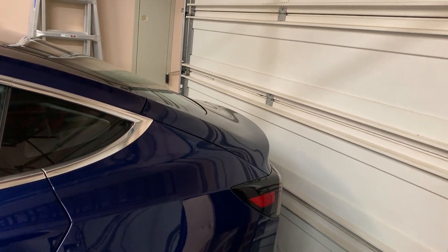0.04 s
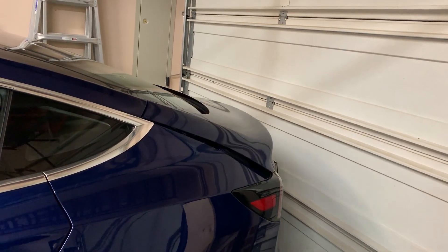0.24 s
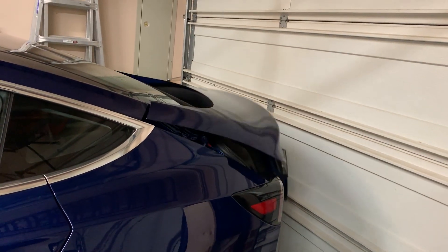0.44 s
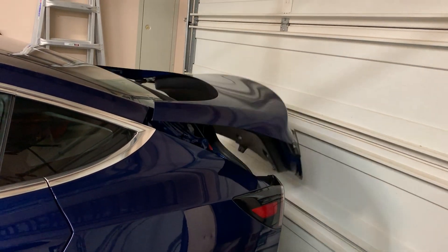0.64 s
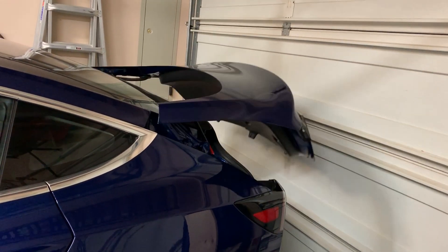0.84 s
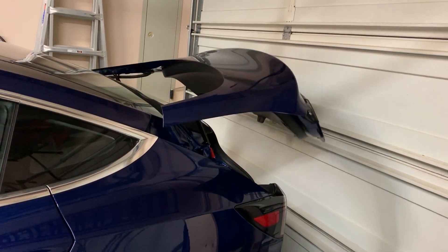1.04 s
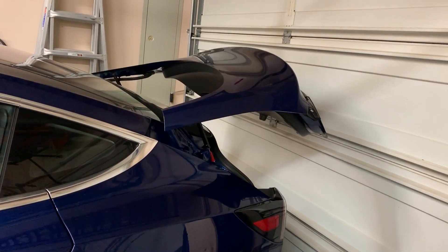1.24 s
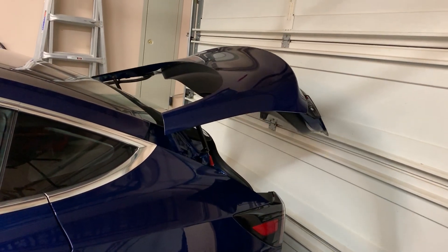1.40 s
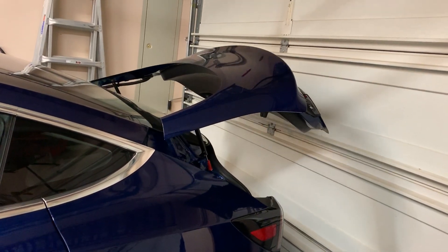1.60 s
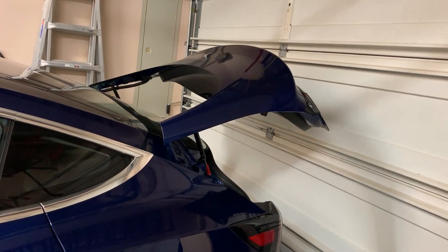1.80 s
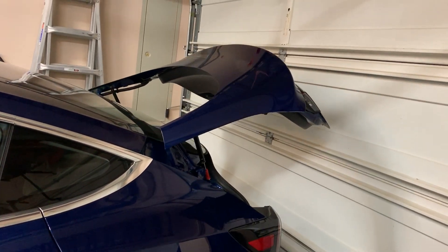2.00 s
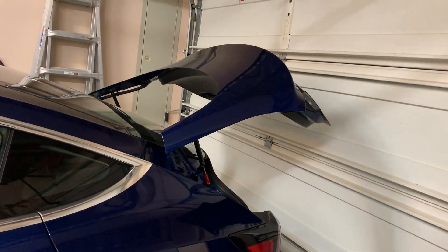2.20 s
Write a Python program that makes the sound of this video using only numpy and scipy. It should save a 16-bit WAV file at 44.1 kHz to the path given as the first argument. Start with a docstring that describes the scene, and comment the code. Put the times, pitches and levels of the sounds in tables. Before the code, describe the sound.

A car trunk unlatches with a whir and booming clunk, then lifts in a garage.

```python
"""Car trunk opening in a garage

The latch motor clicks and whirs, the lid pops off its seal with a boom, a clunk and a bright ring
of the steel catch, and the latch resets with a knock and a clack. Gas hisses through the struts as
the lid rises; their friction makes it shudder as it slows, then it creeps on with faint hinge knocks.
Hard walls throw it all back over a bed of low room tone."""
import sys
import numpy as np
from scipy import signal
from scipy.fft import rfft, irfft
from scipy.io import wavfile
from scipy.ndimage import uniform_filter1d

SR = 44100
rng = np.random.default_rng(int(sys.argv[2]) if len(sys.argv) > 2 else 0)


def bounce(signal):
    """Save signal as a 16-bit WAV file at the path given by the first command-line argument."""
    frames = np.transpose(np.atleast_2d(signal))
    limited = np.clip(frames, -1, 1)
    pcm = np.round(limited * 32767).astype(np.int16)
    wavfile.write(sys.argv[1], SR, pcm)


N = 103635
T = np.arange(N) / SR

# Decay of the garage and of the reflections between car and door: f/Hz, t60/s
GARAGE_DECAY = [(50, 1), (150, 0.78), (400, 0.78), (1000, 0.81), (2000, 0.75), (4000, 0.54), (8000, 0.36),
                (12000, 0.12), (16000, 0.12)]
NEAR_DECAY = [(100, 0.09), (1000, 0.084), (4000, 0.15), (8000, .04), (13000, .028)]
# Balance of those two spaces: f/Hz, left minus right/dB
GARAGE_PAN = [(200, 1), (400, -1), (750, -1.5), (1500, -0.5), (2800, 0.24), (6000, 0.5)]
NEAR_PAN = [(200, -0.5), (400, 0.5), (750, -8.5), (1500, -9.5), (2800, 0), (6000, 0)]
# Stereo likeness of diffuse sound: f/Hz, correlation
LIKENESS = [(50, 0.92), (180, 0.93), (350, .88), (700, 0.57), (1400, 0.11), (2800, .3), (5500, 0.14),
            (8000, 0.99), (15000, 1)]
# Lag of the right channel: f/Hz, share of the full lag
LAG_SHARE = [(100, -.3), (900, -.2), (1600, 1)]

# Cue lists of the impacts: t/s, level/dB, tilt/dB per octave, garage send/dB
LATCH_CLICKS = [(.039, -19.5, -3, -16), (.047, -6.5, -1, -3), (.194, -3.5, -3.5, 4.5),
                (.234, -4.5, -1, -2.5), (.251, -0.5, 0.5, -2), (.257, -8, 0.5, 2.5), (.288, -8, 2.5, 2),
                (1.142, -12.5, -5, -7.5)]
GEAR_KNOCKS = [(.046, -3.5, -1.5, 7), (.078, -2.5, 2.5, 0.5), (.162, -18, -5, -6.5), (.6225, 3, -1, 0)]
LID_CLUNKS = [(.193, 0.5, -4, -4.5), (.201, 13.5, 1, 1), (.217, 10.5, 0, 2.5), (.254, 6.5, 0, 4.5),
              (.289, 2.5, 2.5, -0.5)]
CATCH_SNAPS = [(.2498, 9, 1, -14), (.2545, 13.5, -2, -11)]
SPRING_CLACKS = [(.698, -4.5, 0.5, -0.5), (.709, -10.5, -2.5, -2.5)]
HINGE_TAPS = [(1.392, -27.5, -5, 1.5), (1.499, -21.5, -2, -7), (1.585, -27, 0, 4.5), (1.755, -26, 0.5, 7),
              (1.79, -25, 2.5, -2), (1.88, -34.5, -4.5, -7), (2.017, -21.5, -0.5, -1), (2.19, -27.5, 1, -1)]
# Tone of each impact: f/Hz, level/dB
CLICK_EQ = [(100, -23), (300, -1.5), (700, 2.5), (1400, 1.5), (2200, -1), (2700, 2.5), (3050, 1.5),
            (3450, 0), (4600, -4), (5800, -10), (8000, -3.5), (10400, -4.5), (12500, -13.5), (15500, -16.5)]
KNOCK_EQ = [(80, -18.5), (230, -4), (460, -13.5), (640, 3.5), (850, 3), (1200, -6.5), (1580, 4.5),
            (2050, -6.5), (2500, -19.5), (4200, -25), (6000, -39), (16000, -64.5)]
CLUNK_EQ = [(30, -3.5), (55, -1), (85, -4.5), (130, 0), (170, -3.5), (260, 4.5), (380, 8), (500, -2),
            (780, 0), (1200, -7), (1550, -4), (2300, -15.5), (4000, -23.5), (7000, -32), (16000, -49)]
SNAP_EQ = [(300, -45), (2000, -27.5), (3400, -10.5), (4600, -17.5), (6000, -25), (7000, -12.5),
           (7450, -1.5), (8300, 3), (8750, -11), (9500, -20.5), (10400, -9), (11500, -19.5), (16000, -20)]
CLACK_EQ = [(50, 2), (140, 7.5), (240, 4.5), (420, -1), (770, 1), (1050, -6.5), (1400, 4.5), (2100, -3.5),
            (2750, 4.5), (3700, -3), (5000, -11), (6900, -8), (8000, -12), (10000, -8.5), (13000, -15),
            (15000, -7), (16000, -8)]
TAP_EQ = [(40, 5), (100, -0.5), (300, -9), (450, -9.5), (600, 2.5), (850, -2.5), (1200, -17.5), (2000, -26),
          (5000, -37), (16000, -31)]

# Tone of each noise layer: f/Hz, relative level/dB
ROOM_TONE_EQ = [(12, -31), (20, -1), (49, 0), (70, -7), (101, -11), (228, -18.5), (301, -23), (388, -25),
                (513, -28), (558, -26), (1060, -36), (1330, -35.5), (6360, -48), (11800, -43), (16000, -48)]
GRIND_EQ = [(60, -10), (250, 3.5), (400, -3), (800, -4), (1700, -9.5), (2500, -9.5), (4000, -24),
            (6500, -38), (16000, -47.5)]
HISS_EQ = [(1000, -24), (3500, -15.5), (5100, -3), (6000, -21.5), (7800, -21.5), (8600, -4.5), (9600, -7),
           (10700, -11), (12300, -1), (13900, 4), (15000, -7), (16000, -9)]
SHUDDER_EQ = [(25, -5), (58, 7.5), (100, 0.5), (170, 2), (280, 3.5), (390, 1.5), (480, -7), (730, 2),
              (1000, -9.5), (1400, -6), (2300, -21), (4500, -31), (8000, -38), (16000, -32)]
# Fader rides of the room rumble, strut gas and shaking lid: t/s, level/dB
RUMBLE_RIDE = [(0, -13.5), (.1, -3), (.4, -1.5), (2.35, -0.5)]
HISS_RIDE = [(.25, -100), (.45, -71), (.66, -58.5), (.8, -63.5), (.95, -65.5), (1.06, -62), (1.11, -52.5),
             (1.17, -56), (1.21, -73), (1.26, -93)]
SHUDDER_RIDE = [(.72, -78), (.95, -63), (1.06, -59.5), (1.11, -45), (1.17, -44), (1.195, -52), (1.27, -63),
                (1.36, -82), (1.45, -88)]

# Runs of the latch motor: t/s, length/s, level/dB, starting f/Hz, sag/Hz per s
MOTOR_RUNS = [(0.058, .13, -38, 261.7, 450.5), (0.632, 0.122, -46, 252.5, 8)]
# Booms of the trunk's air: t/s, level/dB, f/Hz, swell/s (half the time to the peak)
AIR_BOOMS = [(0.1956, -14, 72, 0.0042), (0.1997, -16.5, 128, 0.0071), (0.2521, -16, 98, 0.0043),
             (0.27, -28.5, 137.1, 0.011)]
# Modes of the lid panel and the steel catch: f/Hz, relative level/dB, t60/s
LID_MODES = [(47, -13, .9), (64.6, -7, .55), (117, -4, .42), (140, -5, .42), (206, -12, .42),
             (256, -9, .38), (325, -10, .3), (473, -18, .3), (604, -14, .38), (714, -16, .35),
             (808, -16, .3), (1047, -17, .35), (1315, -15, .33), (1480, -20, .33), (1563, -20, .25)]
CATCH_MODES = [(7327, -13, .09), (7820, -0.5, .16), (7240, -2.5, .1), (7977, -4.5, .12), (7570, -1, 0.085),
               (8463, -5, .06), (9200, -5.5, .12), (10330, -12.5, 0.084)]


def amp(db):
    """Decibels to gain."""
    return 10 ** (np.asarray(db) / 20)


def unit(x):
    """Scales to rms 1."""
    return x / np.sqrt(np.mean(x ** 2) + 1e-20)


def curve(points, hz):
    """Reads a table on a log-frequency axis."""
    f, value = np.transpose(points)
    return np.interp(np.log(hz + 1), np.log(f + 1), value)


def ride(points):
    """Fader gain over time, silent outside its points."""
    return amp(np.interp(T, *np.transpose(points), left=-np.inf, right=-np.inf))


def wander(samples):
    """Random drift at rms 1, smoothed over so many samples."""
    return unit(uniform_filter1d(rng.standard_normal(N), size=samples))


def add(mix, s, sound):
    """Mixes a sound in at s seconds."""
    part = mix[..., round(s * SR):][..., :sound.shape[-1]]
    part += sound[..., :part.shape[-1]]


def tinted(noise, eq):
    """Noise through an EQ, at rms 1."""
    gain = amp(curve(eq, np.fft.rfftfreq(N, 1 / SR)))
    return unit(irfft(rfft(noise) * gain, N))


def diffuse(pan, size):
    """Stereo noise whose width, balance and lag vary with frequency."""
    hz = np.fft.rfftfreq(size, 1 / SR)
    mid, side = rfft(rng.standard_normal((2, size)))
    likeness = np.clip(curve(LIKENESS, hz), -1, 1)
    mid *= np.sqrt((1 + likeness) / 2)
    side *= np.sqrt((1 - likeness) / 2)
    lag_s = .265e-3 * curve(LAG_SHARE, hz)
    steer = amp(curve(pan, hz) / 2) * np.exp(1j * np.pi * hz * lag_s)
    return irfft([(mid + side) * steer, (mid - side) / steer], size)


def echoes(decay, pan, rise_s, size):
    """Dense reflections that build and die band by band, with equal energy in each."""
    hz, t, bands = signal.stft(diffuse(pan, size), SR, nperseg=128)
    hop_s, t60 = t[1], curve(decay, hz)[:, None]
    envelope = amp(-60 * t / t60) * (1 - np.exp(-(t + hop_s / 2) / rise_s))
    envelope /= np.sqrt((envelope ** 2).sum(1, keepdims=True) * hop_s * SR)
    return signal.istft(bands * envelope, SR, nperseg=128)[1][:, :size]


def garage(x, send_db):
    """A hidden source bounces off the nearby door, then round the whole garage."""
    paths = amp(send_db) * echoes(GARAGE_DECAY, GARAGE_PAN, rise_s=.0072, size=49152)
    add(paths, 0, echoes(NEAR_DECAY, NEAR_PAN, rise_s=.002, size=8192))
    return signal.fftconvolve(x[None], paths, axes=1)[:, :N]


def transient(eq, tilt_db, size=4096):
    """A minimum-phase click, its EQ tilted about 2 kHz."""
    hz = abs(np.fft.fftfreq(size, 1 / SR))
    octaves = np.log2(np.maximum(hz, 300) / 2000)
    log_gain = np.log(amp(curve(eq, hz) + tilt_db * octaves))
    spectrum = np.exp(np.conj(signal.hilbert(log_gain)))
    return np.fft.ifft(spectrum).real[:size // 2]


def hits(cues, eq, chatter_s=.004, chatter_db=-.5):
    """Short blows in the garage; the parts chatter briefly after each."""
    out, t = np.zeros((2, N)), T[:2048]
    for s, db, tilt_db, send_db in cues:
        force = rng.standard_normal(len(t)) * t * np.exp(-2 * t / chatter_s)
        force *= amp(chatter_db) / np.linalg.norm(force)
        force[0] = 1  # first contact
        blow = signal.fftconvolve(force / np.linalg.norm(force), transient(eq, tilt_db))
        add(out, s, garage(amp(db) * blow, send_db))
    return out


def ring(modes, spread_rad=0):
    """Decaying modes of a struck part, phase-shifted opposite ways left and right."""
    t = T[:SR]
    phases = spread_rad * rng.choice([-1, 1], (len(modes), 1, 1)) * np.array([[1], [-1]])
    return sum(amp(db - 60 * t / t60) * np.sin(2 * np.pi * hz * t + phase)
               for (hz, db, t60), phase in zip(modes, phases))


def room_tone(air_db=-62, rumble_hz=300, hum_hz=554.5, hum_db=-80, waver_db=-1.5):
    """A bed of air whose low rumble fades up early, with a faint wavering hum."""
    air = amp(air_db) * tinted(diffuse(GARAGE_PAN, N), ROOM_TONE_EQ)
    rumble = signal.sosfiltfilt(signal.butter(2, rumble_hz, fs=SR, output="sos"), air)
    hum = amp(waver_db * wander(3000)) * np.sin(2 * np.pi * hum_hz * T)
    return air - rumble + rumble * ride(RUMBLE_RIDE) + amp(hum_db) * unit(hum)


def latch():
    """The latch clicks and its gear knocks against the stops."""
    return hits(LATCH_CLICKS, CLICK_EQ) + hits(GEAR_KNOCKS, KNOCK_EQ)


def motor(wobble_hz=55, fade_s=.016, grain_db=4, grind_db=-7, direct_db=-9):
    """The latch motor groans and sags under load while its uneven gear teeth grind."""
    groan, grind = np.zeros((2, N))
    for s, length, db, start_hz, sag in MOTOR_RUNS:
        hz = start_hz - sag * np.minimum(T, length) + wobble_hz * wander(300)
        teeth = amp(grain_db * wander(90)) * rng.standard_normal(N)
        drive = amp(db) * np.clip(np.minimum(T, length - T) / fade_s, 0, 1)
        add(groan, s, drive * np.sqrt(2) * np.sin(2 * np.pi * np.cumsum(hz) / SR))
        add(grind, s, drive * amp(grind_db) * tinted(teeth, GRIND_EQ))
    direct = amp(direct_db) * groan  # the low groan bends round the car
    return direct + garage(grind + groan / 2, send_db=-3)


def lid_pop(ring_s=.203, ring_db=-18, bloom_s=.0072):
    """The lid clunks off its seal: the trunk's air booms and the panel rings."""
    out, t = hits(LID_CLUNKS, CLUNK_EQ), T[:SR]
    for s, db, hz, swell_s in AIR_BOOMS:
        age = t / (2 * swell_s)
        swell = (age * np.exp(1 - age)) ** 2
        add(out, s, -amp(db) * swell * np.sin(2 * np.pi * hz * t))
    panel = ring(LID_MODES, spread_rad=.26) * (1 - np.exp(-t / bloom_s))
    add(out, ring_s, amp(ring_db) * panel)
    return out


def catch(ring_s=.251, ring_db=-30):
    """The steel catch snaps free and rings brightly."""
    out = hits(CATCH_SNAPS, SNAP_EQ)
    steel = amp(ring_db) * ring(CATCH_MODES)[0]
    add(out, ring_s, garage(steel, send_db=-6.5))
    return out


def strut_hiss():
    """Gas hisses through the struts as the lid rises."""
    gas = tinted(rng.standard_normal(N), HISS_EQ)
    return garage(gas * ride(HISS_RIDE), send_db=-12)


def latch_return():
    """The latch springs back with a double clack."""
    return hits(SPRING_CLACKS, CLACK_EQ)


def lid_shudder(grain_db=4):
    """Gritty friction in the struts shakes the lid as it slows."""
    slips = rng.standard_normal(N) * amp(grain_db * wander(150))
    return garage(tinted(slips, SHUDDER_EQ) * ride(SHUDDER_RIDE), send_db=-3)


def hinges():
    """The hinges knock faintly as the lid creeps on."""
    return hits(HINGE_TAPS, TAP_EQ)


def scene():
    """The release and the lift, over room tone."""
    release = room_tone() + latch() + motor() + lid_pop() + catch()
    return release + strut_hiss() + latch_return() + lid_shudder() + hinges()


def record(dry):
    """A steep high cut at 16 kHz on the whole mix."""
    high_cut = signal.firwin(511, 16000, window=("kaiser", 9), fs=SR)
    return signal.oaconvolve(dry, high_cut[None], "same")


dry = scene()
out = record(dry)
bounce(out)
```